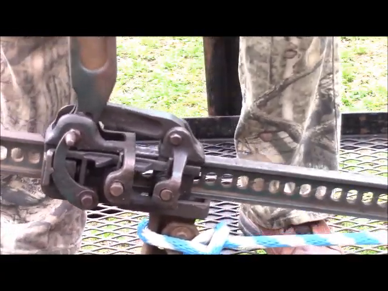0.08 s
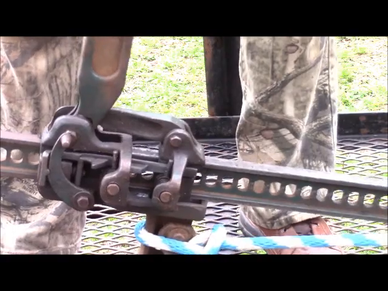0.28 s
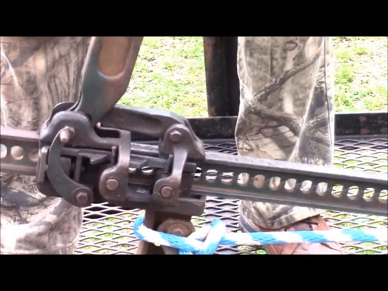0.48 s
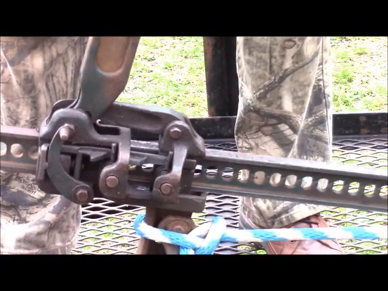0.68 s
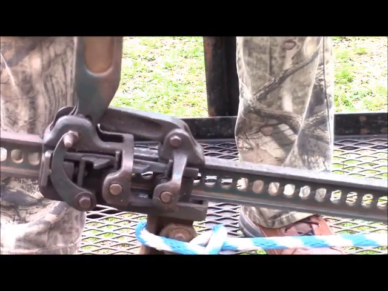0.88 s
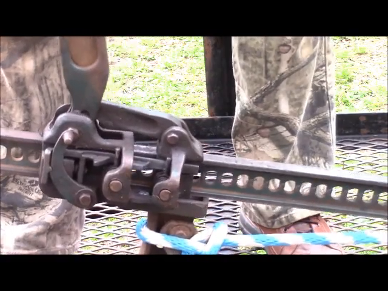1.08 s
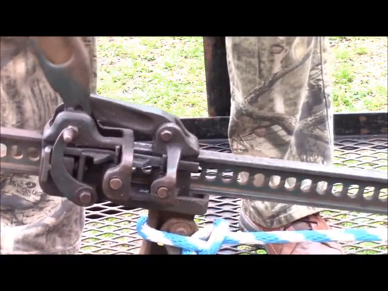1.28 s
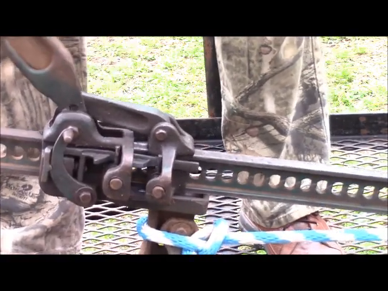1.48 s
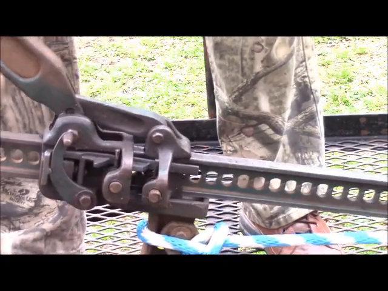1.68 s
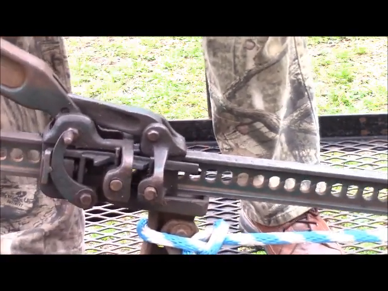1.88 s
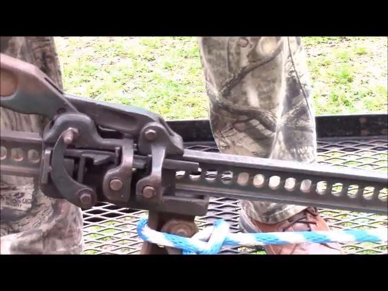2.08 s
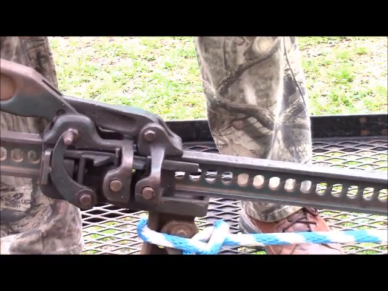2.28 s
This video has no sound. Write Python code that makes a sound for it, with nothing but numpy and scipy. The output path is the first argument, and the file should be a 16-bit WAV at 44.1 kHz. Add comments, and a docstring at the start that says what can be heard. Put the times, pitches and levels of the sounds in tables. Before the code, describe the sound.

A steel lever jack snaps sharply close by at about 0.2 seconds, ringing briefly. Its linkage gives softer clanks near 0.9 seconds and light knocks from 1.3 seconds. Around 1.6 seconds a dry joint squeaks faintly over a dull thud from the trailer deck. A firmer clank comes at 1.75 seconds, then a second sharp, ringing snap at 2 seconds. Faint outdoor air lies underneath.

```python
"""Faint open air, then a sharp steel snap close by: a lever jack winching a load onto a trailer.
Its two spring-loaded pins slam into the holes of the bar in turn, and bar and deck ring.
Between the two snaps the linkage knocks as it takes up slack, the mesh deck thuds under
shifting weight and a dry joint squeaks in short slips."""
import sys
import numpy as np
from scipy import signal
from scipy.fft import rfft, irfft
from scipy.io import wavfile

SR = 44100
rng = np.random.default_rng(int(sys.argv[2]) if len(sys.argv) > 2 else 0)


def output_pcm(signal):
    """Save a mono or channel-first signal as 16-bit PCM at the path in sys.argv[1].

    Samples are clipped to [-1, 1] before scaling.
    """
    pcm = np.clip(np.atleast_2d(signal).T, -1, 1) * 32767
    wavfile.write(sys.argv[1], SR, np.round(pcm).astype(np.int16))


N = 101430
RING_SAMPLES, HIT_SAMPLES = 32768, 2048
SIDE_DB = -21  # nearly mono

def amp(db):
    return 10 ** (np.asarray(db) / 20)

def fade(t, t60):
    return np.exp(-np.log(1000) * t / t60)

def curve_at(points, hz):
    """Read a curve along a log frequency axis."""
    freqs, values = np.transpose(points)
    return np.interp(np.log(hz + 1), np.log(freqs + 1), values)

def wander(rate_hz):
    """Random drift of about unit size."""
    points = rng.standard_normal(N // 10)
    return np.interp(np.arange(N) / SR * rate_hz, np.arange(len(points)), points)

def add(mix, start_s, sound):
    part = mix[:, round(start_s * SR):][:, :sound.shape[-1]]
    part += sound[..., :part.shape[1]]

def spread(mid, side, side_db=SIDE_DB):
    """Mid and side to left and right."""
    return np.array([mid + amp(side_db) * side, mid - amp(side_db) * side])

# Width of sound arriving from all around: freq_hz, side_minus_mid_db
DIFFUSE_WIDTH = [(150, -21.5), (400, -11.5), (2400, -8.5)]
def noise(colour, size, diffuse=False):
    """Stereo noise shaped to a level per octave band."""
    hz = np.fft.rfftfreq(size, 1 / SR)
    magnitude = amp(curve_at(colour, hz)) * np.sqrt(size * SR / (2 * np.log(2) * (hz + 10)))
    mid, side = magnitude * np.exp(2j * np.pi * rng.random((2, len(hz))))
    side_db = curve_at(DIFFUSE_WIDTH, hz) if diffuse else SIDE_DB
    return irfft(spread(mid, side, side_db), size)

# Outdoor bed: freq_hz, octave_level_db
AIR_COLOUR = [(25, -103), (55, -86.5), (90, -79), (128, -60), (165, -65.5), (200, -62), (260, -67.5),
              (400, -69), (800, -70), (1600, -73), (7000, -77.5), (11000, -81.5), (15500, -88.5)]
def air():
    """Distant rumble and a faint steady hiss."""
    return noise(AIR_COLOUR, N, diffuse=True)

# Modes of bar and frame: pitch_hz, level_over_colour_db, t60_s
STEEL_MODES = [(268, 4.5, 0.76), (431.7, -2, 0.66), (746, -5, .35), (777, -5.5, 0.4), (900, -7.5, 0.38),
               (1149, -9, 0.52), (1328, -2, .28), (1561, -8, .2), (2062, -17, 0.46), (2215, -11.5, .26),
               (2240, -9.5, 0.21), (2410, -7.5, 0.23), (2865, -3.5, 0.14), (3054, -9.5, .27),
               (5170, -10.5, .17)]
def steel_ring(colour, decay, tail_db, modes_db, bloom_cycles, rise_s, tail_stretch=2.56):
    """Struck steel: crowded modes dying band by band, a few clear tones, a wide tail from the yard."""
    t, hz = np.arange(RING_SAMPLES) / SR, np.fft.rfftfreq(RING_SAMPLES, 1 / SR)
    spectra = rfft(np.array([noise(colour, RING_SAMPLES), noise(colour, RING_SAMPLES, diffuse=True)]))
    centres, out = [f for f, _ in decay], np.zeros((2, RING_SAMPLES))
    for (band_hz, t60), weights in zip(decay, np.eye(len(decay))):
        band = curve_at(list(zip(centres, weights)), hz)
        near, far = irfft(spectra * band, RING_SAMPLES)
        bloom = 1 - np.exp(-t * band_hz / bloom_cycles)  # bass swells in late
        out += (near * fade(t, t60) + amp(tail_db) * far * fade(t, t60 * tail_stretch)) * bloom
    for pitch_hz, level_db, t60 in STEEL_MODES:
        tone = spread(*np.sin(2 * np.pi * (pitch_hz * t + rng.random((2, 1)))))
        bloom = 1 - np.exp(-t * pitch_hz / bloom_cycles)
        out += tone * amp(curve_at(colour, pitch_hz) + level_db + modes_db) * fade(t, t60) * bloom
    return out * (1 - np.exp(-t / rise_s))

# Bands that colour a knock: freq_hz
KNOCK_BANDS = [130, 270, 450, 900, 1600, 3000, 7000, 13000]
# Linkage hits: start_s, rise_s, contact_db, then octave_level_db for each band, before the body EQ
KNOCKS = [(0.2097, 0.0017, -9, -71.5, -67.5, -61, -63, -48, -41, -58, -71),
          (0.8763, 0.00032, 3.5, -74, -52.5, -49, -56, -57, -57.5, -57, -67),
          (0.9132, 0.0016, 17.5, -72, -51.5, -59, -49.5, -45.5, -51.5, -73, -80),
          (1.459, 0.00089, 2, -75, -75, -57, -62.5, -68, -70, -79, -88),
          (1.293, 0.0019, 3, -82.5, -76, -68.5, -56, -57.5, -72.5, -87, -86),
          (1.315, 0.0021, -7.5, -68, -73, -58, -58, -57.5, -61, -71, -86),
          (1.325, 0.00064, 6, -88, -68, -81, -77, -68, -80, -63, -73),
          (1.343, 0.00073, -1, -69, -59, -57, -62.5, -57, -54, -59.5, -78),
          (1.543, 0.0017, -5, -70, -68.5, -67, -50, -59.5, -56, -76, -76),
          (1.601, 0.0036, 5, -54, -63, -67, -55, -69, -64, -67, -69),
          (1.7583, 0.0005, -2, -60, -56, -43, -48.5, -38.5, -45.5, -47.5, -74),
          (1.884, 0.0041, -10, -77, -62.5, -52.5, -58.5, -51, -72.5, -87, -89)]
# Body EQ shared by all knocks: freq_hz, gain_db
BODY_EQ = [(30, -15.5), (130, 1), (1550, 0.5), (1850, 3.5), (2600, -5), (3100, 1), (4500, -4.5), (5250, 2),
           (5900, -4.5), (6800, 3), (16000, -11)]
# Ring-out of a knock: freq_hz, t60_s
KNOCK_DECAY = [(60, .08), (270, 0.25), (500, 0.27), (1000, 0.21), (2000, 0.13), (4000, 0.096),
               (8000, 0.064), (15000, .06)]
def linkage():
    """Links and handle take up their slack in soft clanks, each with a brief lift at contact."""
    out, t = np.zeros((2, N)), np.arange(RING_SAMPLES) / SR
    freqs = sorted(KNOCK_BANDS + [f for f, _ in BODY_EQ])
    for start_s, rise_s, contact_db, *levels_db in KNOCKS:
        bands = list(zip(KNOCK_BANDS, levels_db))
        colour = [(f, curve_at(bands, f) + curve_at(BODY_EQ, f)) for f in freqs]
        clank = steel_ring(colour, KNOCK_DECAY, tail_db=-17.5, modes_db=-2.5,
                           bloom_cycles=1.3, rise_s=rise_s)
        punch = 1 + amp(contact_db) * fade(t, t60=0.022)
        add(out, start_s, clank * punch)
    return out

# Bright crack of steel on steel: freq_hz, octave_level_db
CRACK_COLOUR = [(300, -45), (1000, -23.5), (2600, -7), (5000, -6), (7800, 0), (12000, -7), (16000, -22)]
def snap(level_db, pitch_hz, t60, crack_db, rise_s=0.00025, low_cut_hz=400):
    """A pin hits steel: a tiny ping and a broadband crack, with no bass."""
    t = np.arange(HIT_SAMPLES) / SR
    envelope = (1 - np.exp(-(t / rise_s) ** 2)) * fade(t, t60)
    ping = envelope / envelope.max() * np.sin(2 * np.pi * pitch_hz * t)
    crack = amp(crack_db) * noise(CRACK_COLOUR, len(t)) * fade(t, t60=0.011)
    low_cut = signal.butter(2, low_cut_hz, "high", fs=SR)
    return amp(level_db) * signal.lfilter(*low_cut, ping + crack)

def jolt(gain_db, width_s):
    """The load settles on the pin: one low push through the frame."""
    age = np.arange(HIT_SAMPLES) / SR / width_s
    return amp(gain_db) * age * np.exp(-age)

# Pin strikes: start_s, level_db, pitch_hz, ping_t60_s, crack_gain_db
PIN_SNAPS = [(0.2201, -36, 6020, 0.0041, -1), (0.2232, -8.5, 7270, 0.0025, -5.5),
             (0.2245, -9, 8230, 0.0077, -11.5), (0.2238, -18, 11630, .012, -20),
             (0.2246, -18.5, 8950, .011, -2.5), (0.231, -22, 8320, .005, -8),
             (1.9814, -23, 8650, 0.0065, -9), (1.9835, -4, 7780, 0.0021, -17),
             (1.9852, -16.5, 8590, 0.012, -1.5)]
# Colour each pin rings out of the jack: freq_hz, octave_level_db
FIRST_PIN = [(40, -86.5), (120, -68), (200, -50), (350, -45.5), (450, -44.5), (660, -48.5), (1000, -32),
             (1400, -35.5), (1750, -35.5), (2200, -25), (2620, -38), (2880, -25), (3400, -30.5),
             (4000, -32), (5200, -27.5), (6000, -32.5), (7000, -24), (8500, -27), (10000, -39),
             (12000, -31.5), (16000, -55.5)]
SECOND_PIN = [(40, -95), (170, -72), (270, -53), (420, -59.5), (580, -45.5), (690, -49), (800, -31.5),
              (900, -30), (1100, -46.5), (1550, -35), (2100, -31.5), (2500, -35), (3020, -29.5),
              (3300, -34.5), (4250, -28.5), (4750, -36), (5250, -25), (5900, -33), (6900, -28),
              (8500, -35.5), (12000, -38), (16000, -67.5)]
# Pins seating: start_s, decay_factor, tail_db, modes_db, bloom_cycles, colour
PIN_SEATINGS = [(0.2234, 0.94, -17, -0.5, 1.9, FIRST_PIN), (1.9844, 0.74, -16.5, -2, 3.9, SECOND_PIN)]
# Dense ring-out of jack and deck: freq_hz, base_t60_s
PIN_DECAY = [(60, .15), (200, 1), (500, 0.8), (1000, 0.32), (2000, .22), (8000, 0.15), (15000, 0.11)]
# Thin tones of pin and spring: start_s, pitch_hz, level_db, t60_s
PIN_TONES = [(0.224, 11730, -51.5, 0.31), (0.224, 2130, -47, .5), (0.224, 964, -36, 0.18),
             (1.985, 5480, -57.5, 0.41)]
# The first pin taking the load: start_s, gain_db, width_s
LOAD_JOLT = (0.2236, -41.5, .0006)
def pins(shimmer_depth=0.006):
    """Each pin catches the rim of its hole, slams home, rings the jack and sings on thinly."""
    out, t = np.zeros((2, N)), np.arange(RING_SAMPLES) / SR
    for start_s, *strike in PIN_SNAPS:
        add(out, start_s, snap(*strike))
    for start_s, decay_factor, tail_db, modes_db, bloom_cycles, colour in PIN_SEATINGS:
        decay = [(f, t60 * decay_factor) for f, t60 in PIN_DECAY]
        add(out, start_s, steel_ring(colour, decay, tail_db, modes_db, bloom_cycles, rise_s=0.00051))
    for start_s, pitch_hz, level_db, t60 in PIN_TONES:
        shimmer = 1 + shimmer_depth * wander(rate_hz=700)[:RING_SAMPLES]
        phase = 2 * np.pi * np.cumsum(pitch_hz * shimmer) / SR
        add(out, start_s, amp(level_db) * fade(t, t60) * np.sin(phase))
    add(out, LOAD_JOLT[0], jolt(*LOAD_JOLT[1:]))
    return out

# Swell of the deck thud: time_s, gain_db
THUD_ENVELOPE = [(1.52, -15), (1.56, -3.5), (1.578, -6), (1.624, 2), (1.656, -0.5), (1.681, -11.5),
                 (1.75, -17), (1.821, -17.5)]
# Its dull body: freq_hz, octave_level_db
THUD_COLOUR = [(30, -80), (70, -62), (125, -52.5), (200, -45), (320, -61), (480, -51), (750, -66.5),
               (1500, -61.5), (4000, -90)]
def deck():
    """The trailer deck rumbles briefly under shifting weight."""
    t = np.arange(N) / SR
    times_s, gains_db = np.transpose(THUD_ENVELOPE)
    gate = (t > times_s[0]) * (t < times_s[-1])
    return noise(THUD_COLOUR, N) * amp(np.interp(t, times_s, gains_db)) * gate

# Slips of the dry joint: start_s, pitch_hz, level_db, tone_length_s
JOINT_SLIPS = [(1.539, 1585, -41.5, .013), (1.555, 1660, -47, 0.026), (1.579, 1550, -51, 0.028),
               (1.606, 1600, -63, .03), (1.643, 1420, -62, 0.051), (1.539, 4150, -58, 0.022),
               (1.539, 8950, -67, .016), (1.596, 3650, -63, .013), (1.597, 6440, -66.5, 0.031)]
# Band of the scraping grit: low_hz, high_hz
GRIT_BAND = [909, 4140]
def squeak(pitch_jitter=0.06, roughness=0.55, grit_db=-12.5):
    """A dry joint creaks in short slips: each a rough, unsteady tone with a trailing scrape of grit."""
    out, t = np.zeros((2, N)), np.arange(N) / SR
    band_pass = signal.butter(2, GRIT_BAND, "band", fs=SR)
    for start_s, pitch_hz, level_db, length_s in JOINT_SLIPS:
        phase = 2 * np.pi * np.cumsum(pitch_hz * (1 + pitch_jitter * wander(rate_hz=952))) / SR
        tone = np.sin(phase) * (1 + roughness * wander(rate_hz=387))
        friction = rng.standard_normal(N) * (1 + roughness * wander(rate_hz=500))
        grit = signal.lfilter(*band_pass, friction)
        progress = np.minimum(t / length_s, 1)
        swell = np.sin(np.pi * progress)
        scrape = amp(grit_db) * progress * fade(t, t60=0.18)
        add(out, start_s, amp(level_db) * (swell * tone + scrape * grit / grit.std()))
    return out

def scene():
    """The jack up close, over a quiet outdoor bed."""
    return pins() + linkage() + squeak() + deck() + air()

def record(dry, ceiling=0.6, high_cut_hz=16300):
    """Soft overload rounds the sharpest peaks; a steep high cut trims the top."""
    rounded = dry / (1 + (dry / ceiling) ** 6) ** (1 / 6)
    high_cut = signal.firwin(255, high_cut_hz, window=("kaiser", 9), fs=SR)
    return signal.oaconvolve(rounded, high_cut[None], "same")

dry = scene()
out = record(dry)
output_pcm(out)
```